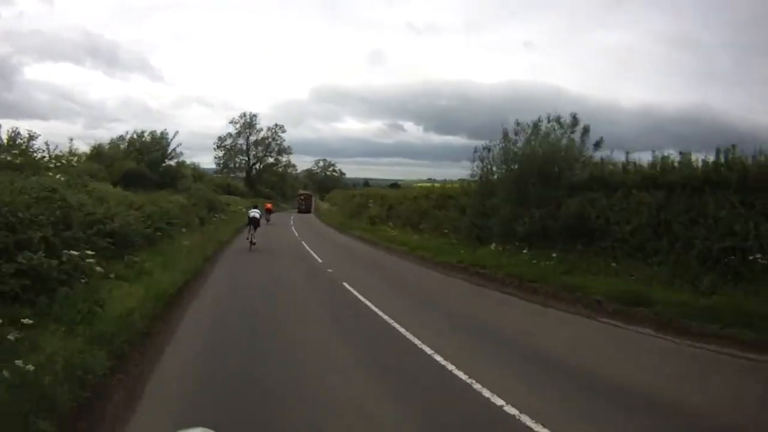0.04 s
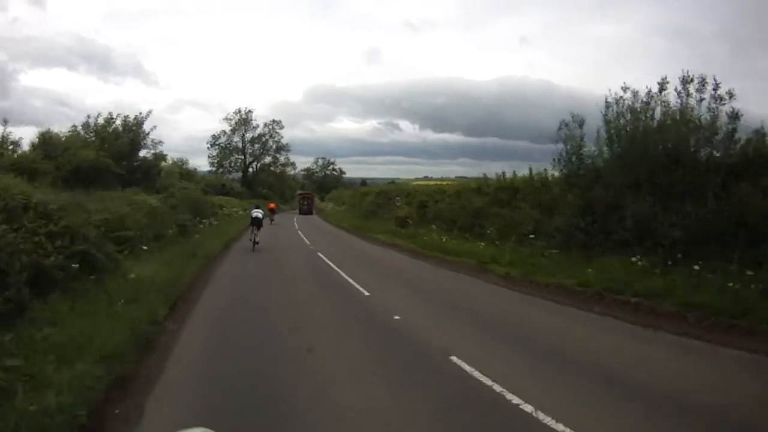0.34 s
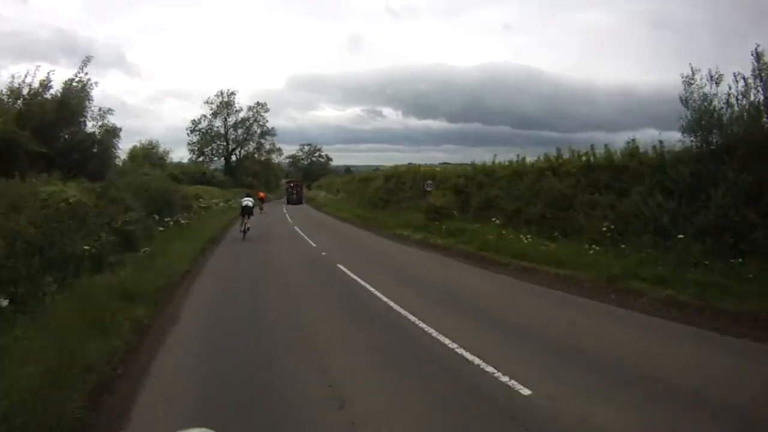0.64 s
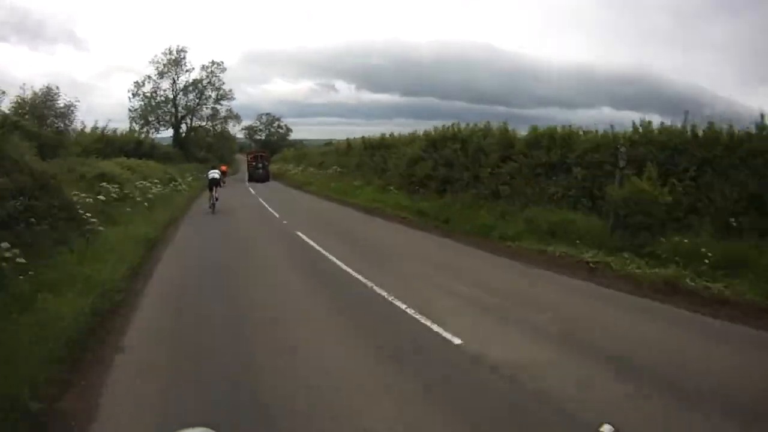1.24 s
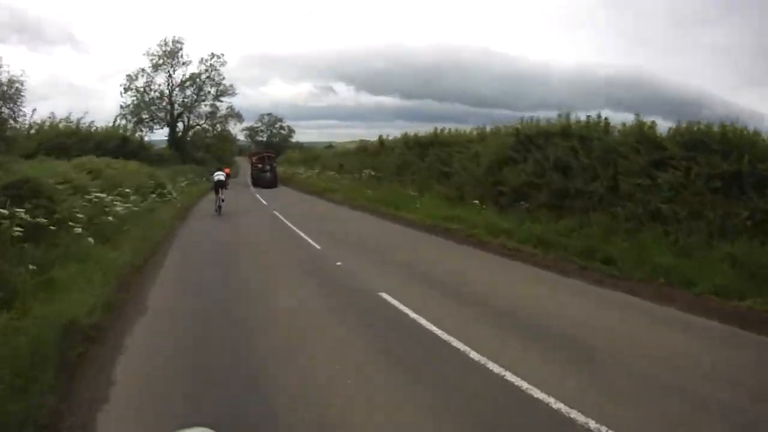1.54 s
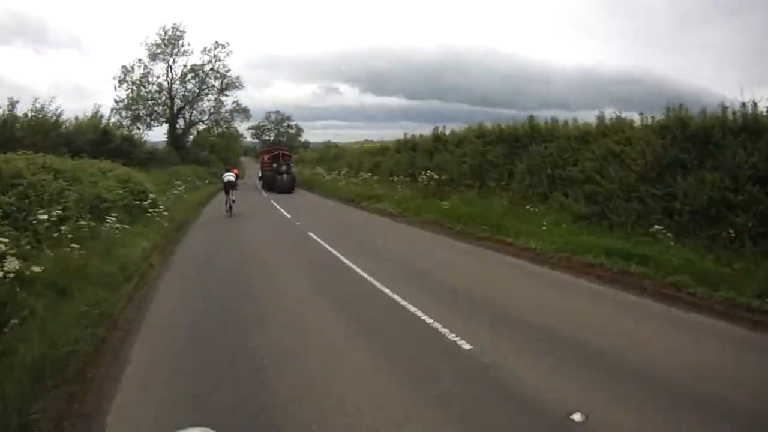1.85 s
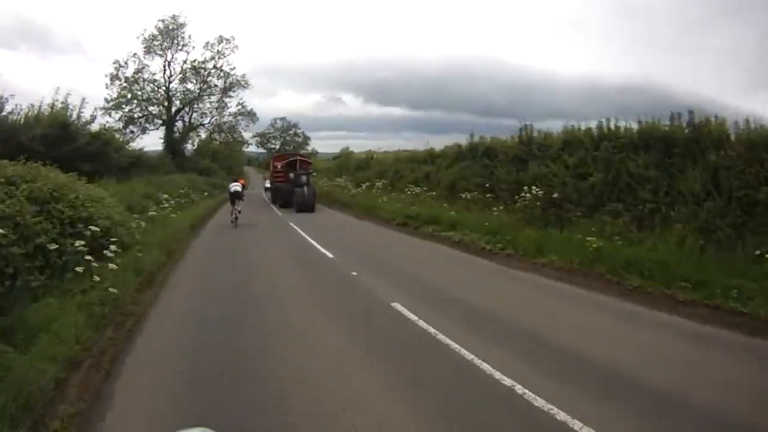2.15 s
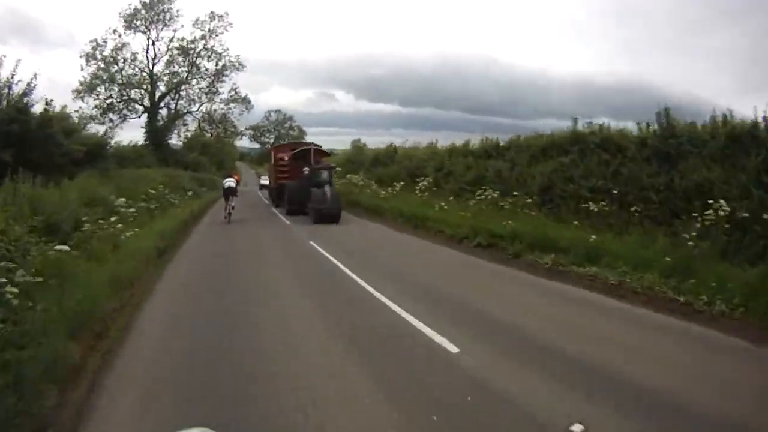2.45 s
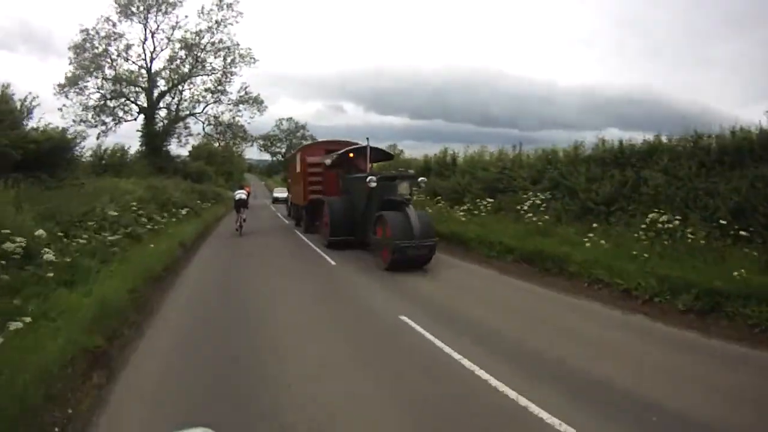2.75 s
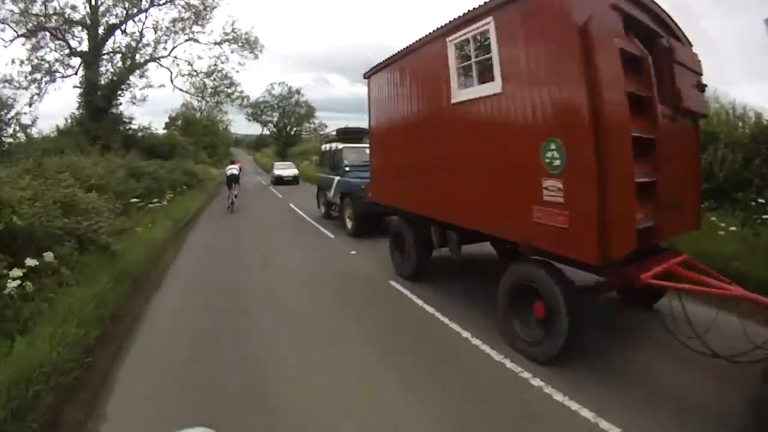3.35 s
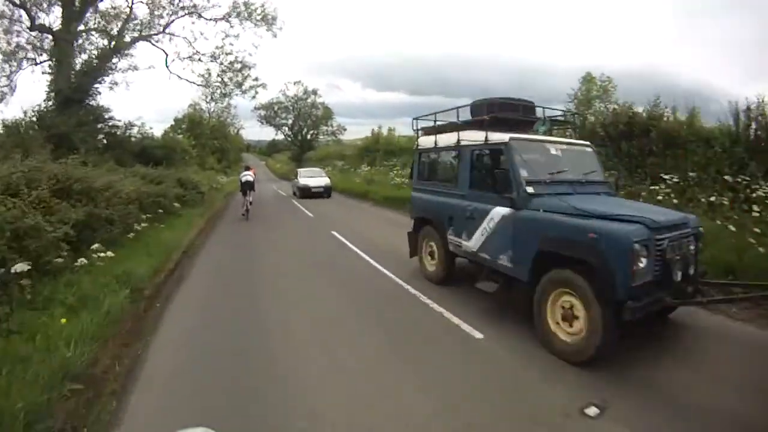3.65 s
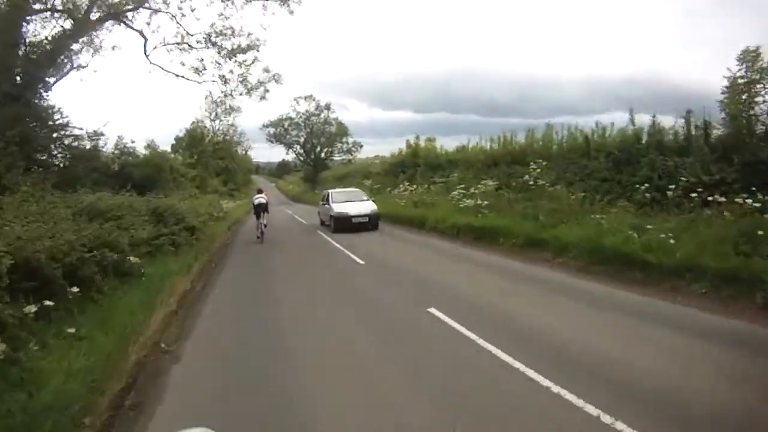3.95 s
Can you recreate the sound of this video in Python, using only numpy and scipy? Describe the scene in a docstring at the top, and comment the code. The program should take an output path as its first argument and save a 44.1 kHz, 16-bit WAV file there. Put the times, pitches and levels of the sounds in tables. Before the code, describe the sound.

A low, buffeting wind roar hits a bicycle-mounted microphone throughout, crackling and popping with tiny lulls. Late on, a line of oncoming vehicles passes on the country road with a faint rumble and a brief, muffled whoosh.

```python
"""A low, buffeting roar of wind on the microphone of a bicycle camera, riding fast on a country road.
Eddies at the microphone port shake the roar, a fluttering rush and a crackle of tiny pressure jumps
that drops out in short lulls. Single slaps of air spit and pop, and big slow eddies thump in the bass.
Near the end a slow line of vehicles rumbles past the other way, almost buried in the wind."""
import sys
import numpy as np
from scipy import signal
from scipy.fft import rfft, irfft, next_fast_len
from scipy.io import wavfile
from scipy.ndimage import map_coordinates

SR = 44100
rng = np.random.default_rng(int(sys.argv[2]) if len(sys.argv) > 2 else 0)


def bounce(signal):
    """Save signal as a 16-bit WAV file at the path given by the first command-line argument."""
    frames = np.transpose(np.atleast_2d(signal))
    limited = np.clip(frames, -1, 1)
    pcm = np.round(limited * 32767).astype(np.int16)
    wavfile.write(sys.argv[1], SR, pcm)


N = 176400

# Fader ride shared by the crackle and its fizz, before their trims: t/s, level/dB
CRACKLE_RIDE = [(0.0, -38.5), (0.28, -37.5), (0.34, -39.5), (0.44, -36.5), (0.54, -39), (0.72, -42),
                (0.8, -36.5), (1.08, -37), (1.3, -38.5), (1.56, -36.5), (1.64, -38.5), (1.8, -41),
                (1.88, -38), (2.1, -39), (2.16, -38), (2.44, -37), (2.5, -40), (2.85, -40), (2.92, -37.5),
                (3.08, -35.5), (3.22, -36.5), (3.3, -40), (3.34, -36), (3.56, -38), (3.7, -42), (4.0, -38)]


def wind():
    """The same eddies drive four layers; lulls duck the highs most, buffets lift mainly the roar."""
    # Lulls, when air runs smoothly over the port: t/s, length/s, crackle dip/dB
    lulls = [(.562, 0.021, 5), (.65, 0.0089, 12), (.935, .012, 7), (1.02, .008, 10), (1.655, 0.042, 6),
             (2.103, 0.021, 11), (2.483, 0.015, 9), (2.558, 0.011, 24), (2.576, 0.017, 10),
             (2.647, 0.022, 19), (2.79, 0.009, 10), (2.863, 0.017, 14), (3.637, 0.0095, 10),
             (3.712, 0.027, 3.5)]
    # Buffets, short blows of air: t/s, length/s, roar lift/dB
    buffets = [(.42, 0.018, 2), (.495, 0.046, 5), (.66, 0.069, 2.5), (.745, 0.02, 2.5), (2.375, 0.045, 5),
               (3.31, .03, 1.5), (3.37, 0.042, 1.5), (3.58, 0.021, 7.5), (3.742, .025, 6)]
    eddies, lull_db, buffet_db = turbulence(), swells(lulls), swells(buffets)
    return (roar(eddies) * amp(buffet_db - 0.19 * lull_db)
            + rush(eddies) * amp(0.12 * buffet_db - 0.27 * lull_db)
            + crackle(eddies) * amp(-lull_db)
            + fizz(eddies) * amp(-2 * lull_db))


def turbulence():
    """Momentary strength of the eddies at the port: small ones ride on large ones."""
    large = -np.exp(-wobble(per_s=45))  # sags further than it peaks
    large = unit(large - large.mean())
    medium, small = wobble(per_s=260), wobble(per_s=1100)
    return np.minimum(unit(0.1 * large + 0.7 * medium + small), 3.1)


def roar(eddies):
    """The body of the wind: low noise that the eddies sway by about a decibel."""
    # Fader ride, before the trim: t/s, level/dB
    ride = [(0.0, -22.5), (0.32, -23), (0.48, -22.5), (0.58, -22), (0.66, -21.5), (0.96, -22.5),
            (1.14, -22.5), (1.24, -26), (1.5, -23.5), (1.6, -21), (1.72, -23), (1.88, -25.5), (1.96, -21),
            (2.22, -23.3), (2.38, -22), (2.45, -28), (2.56, -20.5), (2.72, -28), (2.8, -21.5),
            (3.12, -21.5), (3.22, -23), (3.38, -22.5), (3.7, -26), (4.0, -23.5)]
    # Low, heavy tone: f/Hz, level/dB
    colour = [(20, -27), (45, -21), (68, -21.5), (95, -8.5), (135, -7), (200, -0.5), (280, 1.5), (420, -1),
              (700, -8.5), (1400, -18), (3000, -86.5)]
    trim_db = 0.43
    air = rng.standard_normal(N) * amp(eddies)
    return coloured(air, colour) * amp(curve(ride) + trim_db)


def rush(eddies):
    """Midrange air noise that flutters as the eddies strike."""
    # Fader ride, before the trim: t/s, level/dB
    ride = [(0.0, -24), (0.12, -22), (0.34, -23.5), (0.42, -22.5), (0.72, -25), (0.9, -20.5), (0.96, -23.5),
            (1.1, -21), (1.24, -24.5), (1.48, -22), (1.65, -24.5), (1.72, -23), (1.8, -27), (1.87, -23),
            (1.97, -22.5), (2.03, -26.5), (2.1, -21), (2.38, -22.5), (2.5, -22.5), (2.62, -22),
            (2.68, -24.5), (2.88, -23.3), (2.98, -21.5), (3.36, -22), (3.58, -22.3), (3.69, -25.5),
            (3.85, -26), (4.0, -23.5)]
    # Broad midrange tone: f/Hz, level/dB
    colour = [(100, -29), (300, -2), (550, 0.5), (900, -1), (1300, -3.5), (1750, -5.5), (2150, -11.5),
              (2600, -19.5), (4000, -42.5), (8000, -61), (15000, -83)]
    trim_db = 0.5
    air = rng.standard_normal(N) * flutter(eddies, swing_db=5, flicker_db=2, ceiling_db=2)
    return coloured(air, colour) * amp(curve(ride) + trim_db)


def crackle(eddies):
    """Dense, tiny pressure jumps, chopped hard by the eddies."""
    # Crisp upper mids: f/Hz, level/dB
    colour = [(300, -15), (1200, -1), (2600, 1.5), (3800, 0), (5200, -5), (6500, -13.5), (8000, -19),
              (10500, -28), (15000, -88)]
    trim_db = 2
    grains = jumps(per_s=4500) * flutter(eddies, swing_db=9.5, flicker_db=3, ceiling_db=1.5)
    return coloured(grains, colour) * amp(curve(CRACKLE_RIDE) + trim_db)


def fizz(eddies):
    """The crackle's bright edge: sparser jumps that follow the wind's level more steeply."""
    # Treble sizzle: f/Hz, level/dB
    colour = [(1500, -44), (4000, -2), (6000, 2), (7800, -1), (10000, -10), (12000, -20.5), (14000, -31),
              (15200, -43)]
    trim_db, steepness = -9.5, 1.85
    ride_db = curve(CRACKLE_RIDE)
    steep_db = ride_db.mean() + steepness * (ride_db - ride_db.mean())
    grains = jumps(per_s=1800) * flutter(eddies, swing_db=6.5, flicker_db=3, ceiling_db=9.5)
    return coloured(grains, colour) * amp(steep_db + trim_db)


def spits():
    """The hardest slaps of air on the port, each a bright burst about a millisecond long."""
    # Slaps: t/s, nominal peak/dB
    hits = [(0.0794, -17), (0.573, -20), (0.9896, -19), (1.1956, -17), (2.3024, -22), (2.55, -17.5),
            (2.602, -22.5), (2.608, -20.5), (2.621, -23), (2.8097, -21.5), (2.8386, -34), (3.234, -18.5),
            (3.453, -25), (3.9273, -18.5)]
    # Wide, bright tone: f/Hz, level/dB
    colour = [(100, -8), (500, 5.5), (1500, 3.5), (2800, 3), (4500, -1), (8000, -11), (11000, -24),
              (15000, -41)]
    half_length_s, crest_db = 0.00071, 4
    return puffs([(s, half_length_s, db - crest_db) for s, db in hits], colour)


def pops():
    """Each pop is one pressure spike, dulled by the microphone port."""
    # Spikes: t/s, peak/dB
    hits = [(0.111, -12), (0.6918, -9), (1.2569, -8.5), (1.2652, -8.5), (1.3985, -12), (1.7253, -7),
            (1.8795, -7), (1.9679, -10), (2.6385, -8), (2.7254, -10), (2.8269, -8), (3.0427, -6.5),
            (3.3897, -7), (3.453, -11), (3.58, -12), (3.8156, -8.5)]
    # Dull tone of the port: f/Hz, level/dB
    colour = [(40, -28), (200, -6), (500, 2.5), (1100, 3), (1800, -7), (2800, -19), (6000, -26),
              (15000, -73)]
    spike = coloured(signal.unit_impulse(N), colour)[:SR // 20]
    times, peak_db = np.transpose(hits)
    triggers = np.bincount(np.round(times * SR).astype(int), amp(peak_db), N)
    return signal.fftconvolve(triggers, spike / np.abs(spike).max())[:N]


def thumps():
    """Big slow eddies land as soft blows in the bass."""
    # Blows: t/s, half length/s, level/dB
    hits = [(.495, 0.028, -30.5), (.73, 0.031, -25), (2.485, 0.024, -32), (2.805, 0.039, -31.5),
            (3.125, .03, -34), (3.25, 0.023, -31), (3.38, 0.044, -32)]
    # Bass-only tone: f/Hz, level/dB
    colour = [(30, -34), (85, -12), (140, -4), (200, -4), (400, -31.5), (3000, -120)]
    return puffs(hits, colour)


def traffic():
    """The rumble of wheels and engines swells and fades with distance."""
    # Engine and road tone: f/Hz, level/dB
    colour = [(40, -36), (95, 0.5), (200, -8.5), (400, 5.5), (750, -3), (1500, -21.5), (4000, -50),
              (14000, -93)]
    closest_s, closest_m, closest_db, closing_m_per_s = 3.4, 3.5, -26.5, 6.5
    distance_m = np.hypot(closest_m, closing_m_per_s * (np.arange(N) / SR - closest_s))
    return amp(closest_db) * closest_m / distance_m * coloured(rng.standard_normal(N), colour)


def bow_wave():
    """A passing wagon pushes a short whoosh of air ahead of it."""
    # The push: t/s, half length/s, level/dB
    push = [(3.372, 0.029, -18.5)]
    # Muffled midrange: f/Hz, level/dB
    colour = [(60, -31), (250, -1), (500, 0), (800, 2), (1200, -11.5), (3000, -50), (12000, -120)]
    return puffs(push, colour)


def ticks():
    """Thin, high ticks as the vehicles come close."""
    # Ticks: t/s, half length/s, level/dB
    hits = [(2.956, .005, -35), (3.234, 0.0045, -31.5)]
    # Narrow treble peak: f/Hz, level/dB
    colour = [(1500, -40), (3600, -5), (4500, 1), (5400, -8), (8000, -23), (15000, -70)]
    return puffs(hits, colour)


def flutter(eddies, swing_db, flicker_db, ceiling_db):
    """A layer's gain from the eddies plus its own flicker: it drops freely but saturates at the top."""
    return np.tanh(amp(swing_db * eddies + flicker_db * wobble(per_s=450) - ceiling_db))


def jumps(per_s):
    """Tiny pressure jumps at random moments: mostly small, a few large."""
    size = rng.uniform(-0.85, 1, N)
    return size * np.abs(size) * (rng.random(N) < per_s / SR)


def swells(rows):
    """Flat-topped, steep-edged swells in dB, from rows of t/s, length/s, height/dB."""
    t = np.arange(N) / SR
    return sum(db / (1 + (2 * (t - s) / length) ** 6) for s, length, db in rows)


def puffs(rows, colour):
    """Bell-shaped bursts of coloured noise, from rows of t/s, half length/s, level/dB."""
    t = np.arange(N) / SR
    envelope = sum(amp(db) * np.exp(-np.square((t - s) / half)) for s, half, db in rows)
    return envelope * coloured(rng.standard_normal(N), colour)


def coloured(x, points):
    """x through a minimum-phase EQ drawn from points of f/Hz, level/dB, then scaled to rms 1."""
    size = 2 * next_fast_len(N // 2 + 8192)
    hz, db = np.transpose(points)
    bin_hz = np.fft.rfftfreq(size, 1 / SR)
    gain = amp(np.interp(np.log(bin_hz + 1), np.log(hz), db))
    cepstrum = irfft(np.log(gain))
    cepstrum[1:size // 2] *= 2  # folded forward, so nothing rings ahead of a hit
    cepstrum[size // 2 + 1:] = 0
    response = np.exp(rfft(cepstrum))
    return unit(irfft(rfft(x, size) * response)[:N])


def wobble(per_s):
    """A smooth random curve at rms 1, with per_s knots a second."""
    knots = rng.standard_normal(N // 8)
    return unit(map_coordinates(knots, [np.arange(N) * per_s / SR], mode="wrap"))


def curve(rows):
    """Points of t/s, level/dB joined into one level per sample."""
    return np.interp(np.arange(N) / SR, *np.transpose(rows))


def amp(db):
    """Decibels to gain."""
    return 10 ** (np.asarray(db) / 20)


def unit(x):
    """Scale to rms 1."""
    return x / np.sqrt(np.mean(x ** 2) + 1e-20)


def scene():
    """Wind up front and the vehicles behind it, in mono."""
    air = wind() + spits() + pops() + thumps()
    vehicles = traffic() + bow_wave() + ticks()
    return (air + vehicles)[None]


def record(dry):
    """The camera cuts off steeply above its band limit."""
    top_hz = 15200
    return signal.sosfilt(signal.cheby1(12, .1, top_hz, fs=SR, output="sos"), dry)


dry = scene()
out = record(dry)
bounce(out)
```